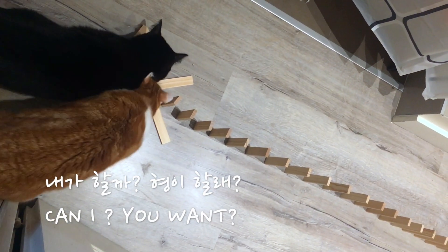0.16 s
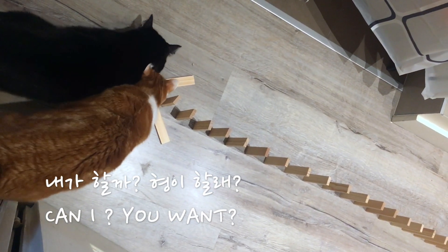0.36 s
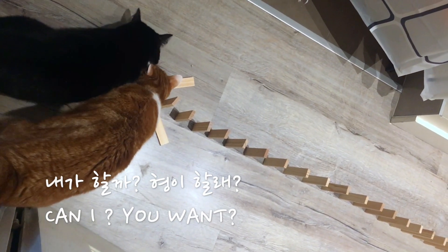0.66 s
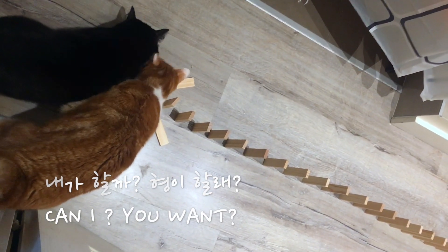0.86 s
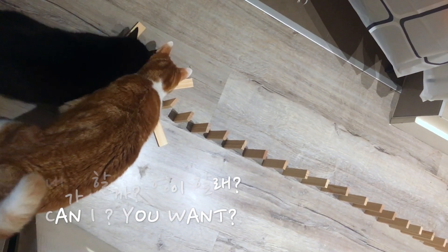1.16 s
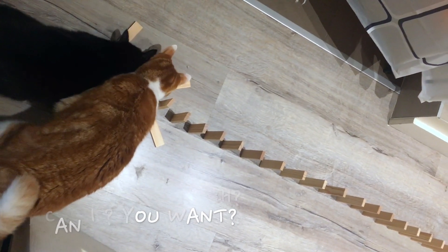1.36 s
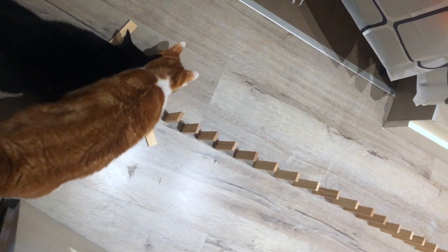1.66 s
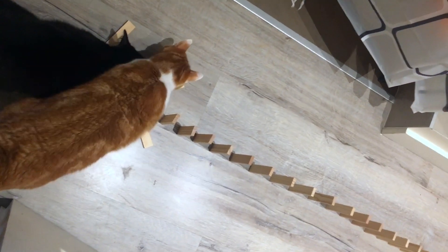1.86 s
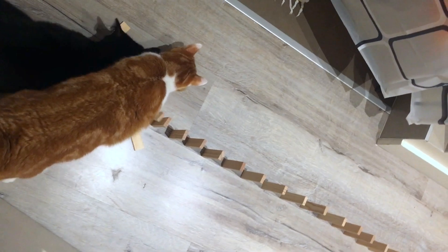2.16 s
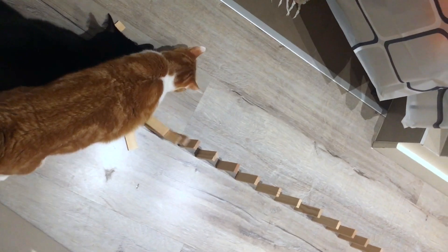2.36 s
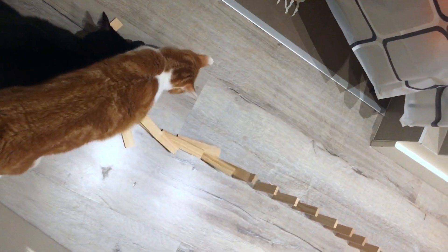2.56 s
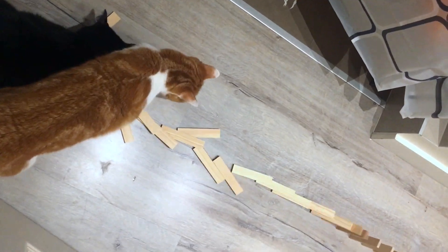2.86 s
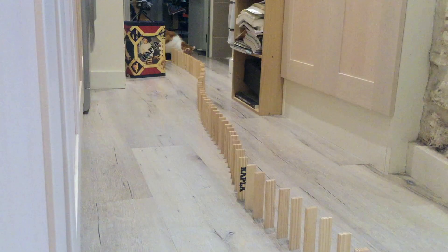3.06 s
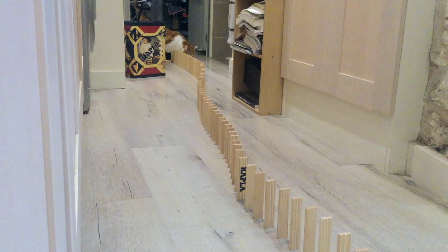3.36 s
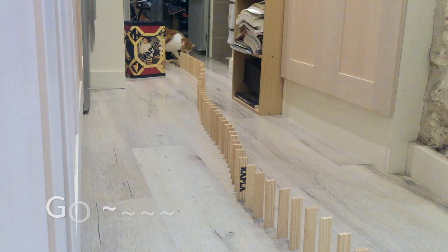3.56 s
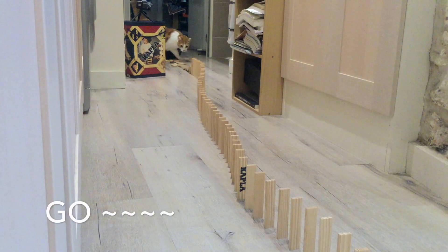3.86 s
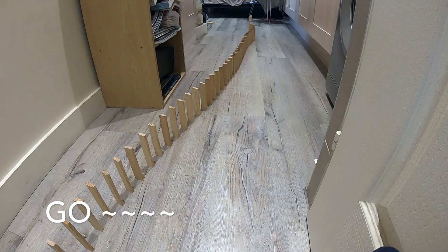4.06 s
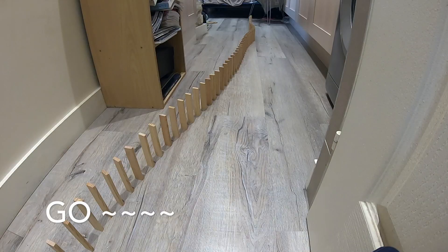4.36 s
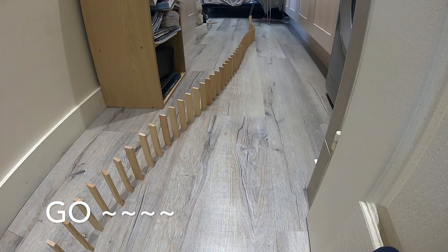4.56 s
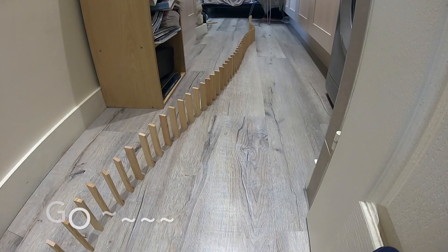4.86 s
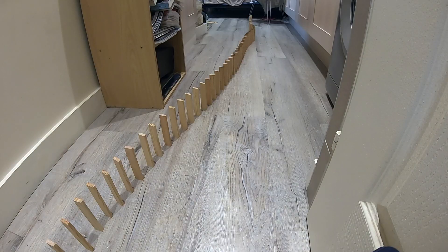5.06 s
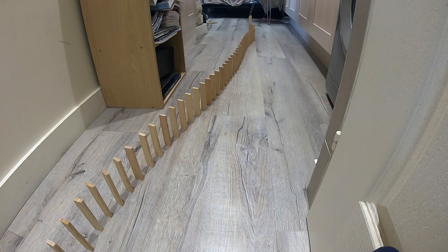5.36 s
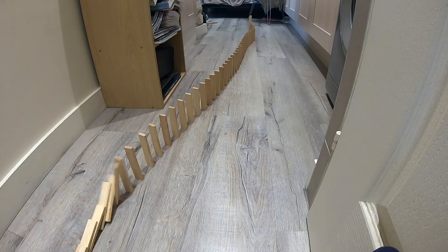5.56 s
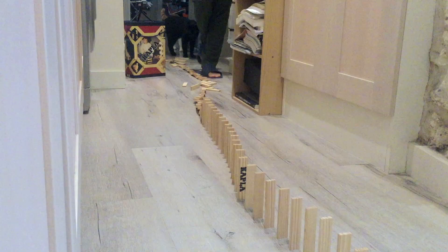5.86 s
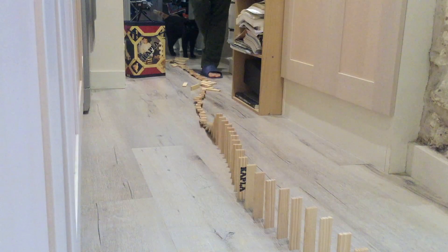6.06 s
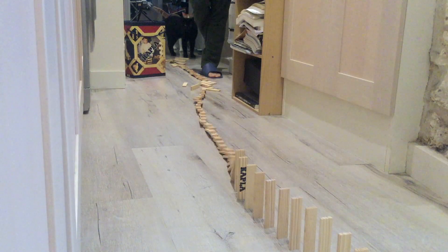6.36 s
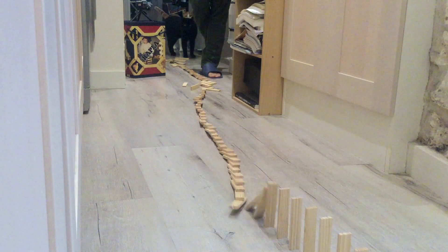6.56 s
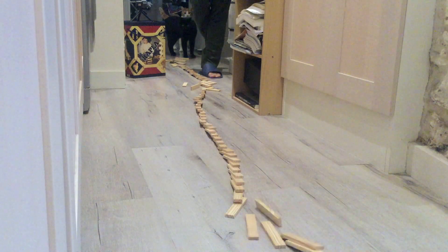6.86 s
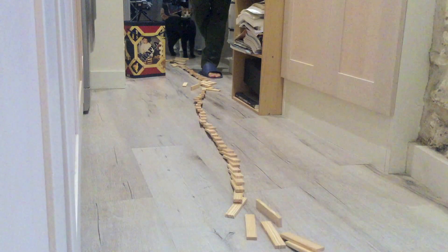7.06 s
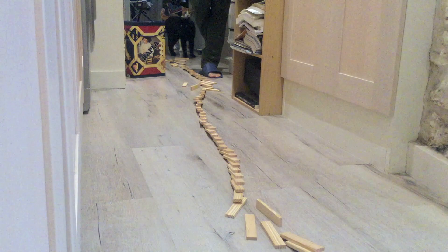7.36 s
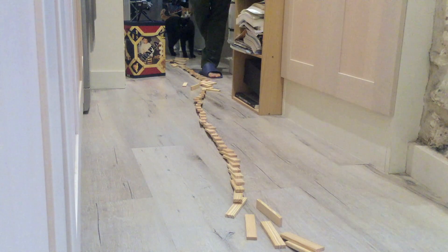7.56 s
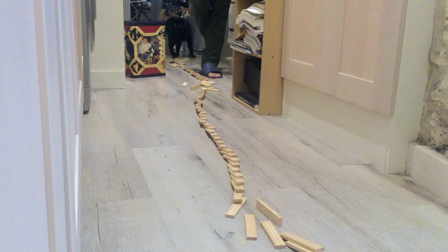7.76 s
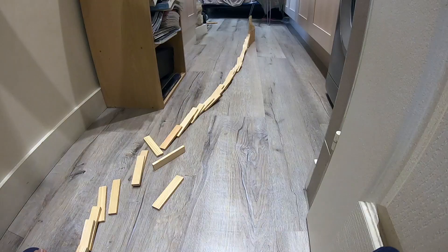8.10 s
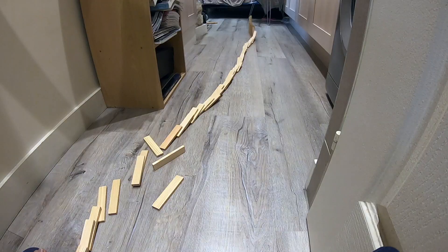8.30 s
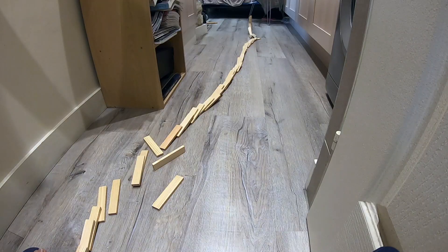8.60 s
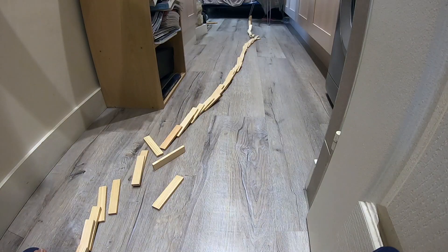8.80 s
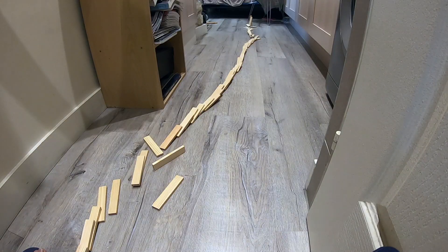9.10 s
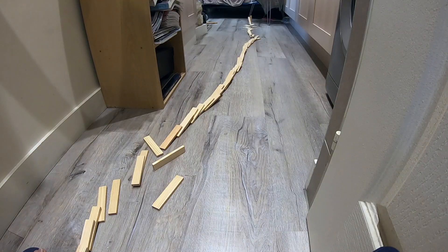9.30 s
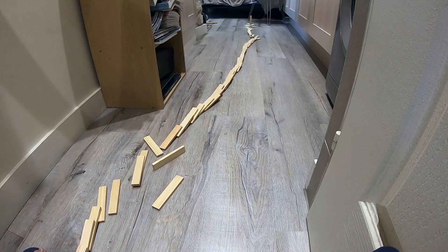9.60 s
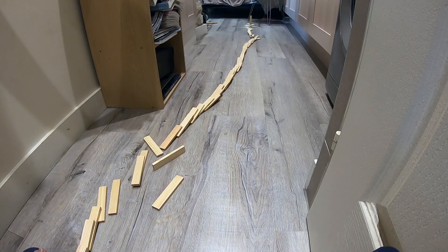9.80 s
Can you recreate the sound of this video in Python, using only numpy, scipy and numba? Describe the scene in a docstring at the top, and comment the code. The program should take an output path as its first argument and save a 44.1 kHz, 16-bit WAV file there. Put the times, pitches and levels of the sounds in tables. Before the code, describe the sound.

For the first two seconds a hallway is quiet, with low room noise, a few soft knocks of cat paws and a faint rustle of fur. At about 2.2 seconds small wooden planks begin toppling in a chain on a hard floor: rapid sharp clicks, short bright rings and light thuds, smeared by a short echo. At 3 seconds the clatter cuts off, then returns more distant and grows. It breaks again just after 4 seconds, with a soft bump and rustle. From about 4.6 seconds it builds, loud and wide, moving from the right toward the centre, with a brief low rumble near 5.5. Around 6 seconds the sound narrows and keeps running, getting closer and crisper, until planks slap flat around 7.5 and it thins out. At 8 seconds a dense, wide clatter resumes abruptly, ending with a few flat slaps by about 9.6 seconds.

```python
"""In a hallway, a chain of small wooden planks topples on a laminate floor.
Each blow makes a plank ring by bending and twisting, gives a sharp crack and thuds into the floor.
The hallway's echo smears it. We hear five stretches, each with its own tone colour, two in wide stereo.
Below lie the paws and fur of two cats, a faint hum, low rumble, room noise and hiss."""
import sys
import numpy as np
from scipy import signal
from scipy.fft import rfft, irfft, next_fast_len
from scipy.io import wavfile
from numba import njit

SR = 44100
rng = np.random.default_rng(int(sys.argv[2]) if len(sys.argv) > 2 else 0)


def store_pcm(level_fs):
    """Save levels as 16-bit WAV."""
    pcm = np.round(np.clip(level_fs, -1, 1) * 32767).astype(np.int16)
    wavfile.write(sys.argv[1], SR, np.atleast_2d(pcm).T)


N = 438354

# where the five stretches begin and end (time [s])
STRETCH_EDGES = [0, 2.998, 4.064, 5.906, 8.061, 9.95]
# tone colour from microphone and distance, one list a stretch (frequency [Hz], gain [dB])
MIC_COLOURS = [
    [(90, -11), (200, -4), (350, 2), (700, 8), (1400, 3), (2200, 12.5), (4500, 8), (9000, 6), (11000, -3.5),
     (16000, 7)],
    [(90, -16), (200, -9), (350, 2.5), (700, 1), (1400, 5), (2200, 9.5), (4500, 2), (9000, -5),
     (11000, -13.5), (16000, -6)],
    [(90, -18.5), (200, -4.5), (350, -0.1), (700, 0), (900, -7), (1400, -1.5), (2200, 3), (4500, 1),
     (9000, -6.5), (11000, -13), (16000, -21)],
    [(90, -23), (200, -8), (350, -2), (700, 2.5), (1400, 3), (2200, 2), (4500, 7), (9000, 8), (11000, -8.5),
     (16000, 0)],
    [(90, -26.5), (200, -11), (350, -3.5), (700, 3), (1400, -1), (2200, 1), (4500, 3), (9000, 1),
     (11000, -6.5), (16000, -10.5)],
]
# the floor's natural notes; a ring time is how long 60 dB of fading takes
# (pitch [Hz], level [dB], ring time [s])
FLOOR_NOTES = [(145, -15.5, 0.054), (190, -9, 0.036), (316, -2.15, 0.04), (412.7, -3.5, 0.051),
               (508, 0.5, 0.035), (642, -1.5, 0.024)]
# a plank's highest notes against its twisting note, stronger when it falls nearby (time [s], level [dB])
BRIGHTNESS = [(2.2, -15.5), (2.99, -13), (3.2, -12), (4.06, -11), (4.6, -30.5), (5.4, -27.5), (5.89, -14.5),
              (5.92, -10), (6.9, -2.5), (7.2, 0.5), (7.9, -1), (8.06, -38), (9.0, -32.5), (9.65, -28.5)]
# where the planks are falling (time [s], left over right [dB])
PAN = [(4.15, -13.5), (4.7, -19), (5.3, -9.5), (5.5, -3), (8.0, 1), (9.65, 2.5)]
TIME, PITCHES, LEVELS, DAMPING = 0, slice(1, 3), slice(3, 7), 8   # rows of the array from place_blows()


def falling_planks(start, end, mic):
    """The main blows of one stretch. A plank that slams flat sounds bright and hardly rings."""
    # (time [s], bending [dB], bending pitch [Hz], twisting pitch [Hz], thud [dB], twisting [dB])
    main_blows = [(2.1963, -48, 2820, 6380, -47, -56.5), (2.319, -25.5, 2820, 7800, -39, -37.5),
                  (2.3672, -29, 2880, 7270, -45, -55), (2.3962, -24, 2740, 6940, -37.5, -37.5),
                  (2.4584, -28.5, 2700, 7110, -38, -37), (2.469, -18, 2795, 7400, -36.5, -43.5),
                  (2.5151, -29.5, 2500, 7700, -36, -45.5), (2.5274, -22.5, 2410, 7700, -36, -35.5),
                  (2.571, -25, 2740, 6890, -37.5, -42.5), (2.577, -17.5, 2930, 7160, -37.5, -32.5),
                  (2.597, -17.5, 2820, 6900, -37, -35), (2.6235, -26, 3050, 7420, -33.5, -31.5),
                  (2.631, -19.5, 2920, 7600, -34, -31), (2.655, -30.5, 2880, 7540, -44, -26.5),
                  (2.6716, -15, 3130, 7660, -29, -29.5), (2.7214, -15, 3210, 5600, -32.5, -23),
                  (2.728, -16.5, 2360, 6200, -35.5, -32), (2.7701, -15.5, 2740, 6580, -38, -23),
                  (2.788, -22, 3480, 6400, -40, -35.5), (2.8167, -17.5, 3497, 6450, -38, -26.5),
                  (2.861, -23, 2790, 6870, -34, -29), (2.9075, -20.5, 2390, 5500, -31.5, -21.5),
                  (2.9505, -15.5, 2950, 5700, -35.5, -26.5), (2.988, -20.5, 2720, 6400, -33.5, -26.5),
                  (3.233, -49.5, 2790, 6300, -55.5, -63), (3.3553, -35, 2640, 6300, -53, -51.5),
                  (3.404, -50, 2460, 6310, -52, -65), (3.4332, -34, 2800, 7170, -46.5, -48),
                  (3.495, -41, 2390, 7600, -45.5, -55), (3.5004, -27, 3060, 7600, -43, -45.5),
                  (3.5486, -35, 2950, 7560, -45, -54), (3.5648, -31.5, 3100, 5790, -40.5, -43),
                  (3.6074, -27.5, 2300, 7800, -39, -47), (3.6167, -29, 2970, 7540, -42, -43),
                  (3.656, -27, 2710, 7630, -38, -40), (3.706, -26.5, 3010, 7700, -36, -35.5),
                  (3.7573, -24.5, 3480, 6210, -39.5, -33), (3.8034, -24.5, 2620, 6600, -41, -36),
                  (3.8227, -30, 2830, 6250, -40, -30), (3.896, -35, 2880, 6300, -41.5, -37),
                  (3.9432, -27, 2920, 7170, -36.5, -29), (3.984, -23.5, 2840, 6840, -42, -37),
                  (4.0198, -30, 3020, 6770, -42, -32), (4.0562, -16.5, 2370, 5050, -41, -29),
                  (4.5283, -81, 2370, 4970, -65, -82), (4.601, -40, 2830, 7480, -39, -55),
                  (4.7234, -20.5, 2700, 6420, -32.5, -40), (4.774, -30, 2820, 7040, -37, -45.5),
                  (4.8019, -20, 2680, 7600, -31, -37.5), (4.8656, -13, 2807, 7250, -26, -33),
                  (4.9205, -15.5, 2950, 7630, -28, -37.5), (4.9663, -22, 2720, 7520, -25.5, -35),
                  (4.9814, -15, 2940, 7630, -28.5, -33.5), (5.0099, -18.5, 2800, 7560, -33, -35.5),
                  (5.032, -23.5, 3070, 7340, -22, -28), (5.078, -15, 3040, 7480, -24, -24.5),
                  (5.125, -13, 2437, 7510, -27.5, -25.5), (5.1742, -15, 2790, 6250, -30.5, -22),
                  (5.214, -19, 3540, 6300, -33, -29), (5.222, -15.5, 2715, 7670, -28, -26.5),
                  (5.2622, -16.5, 2760, 7000, -24.5, -26.5), (5.3123, -10.5, 2810, 6790, -28.5, -22.5),
                  (5.3541, -24.5, 2780, 6520, -23, -21.5), (5.3875, -10, 2930, 7180, -34.5, -26.5),
                  (5.395, -26, 2280, 6630, -35, -23), (5.4245, -15, 2780, 6690, -26.5, -23.5),
                  (5.4598, -11, 2645, 6860, -25.5, -25), (5.5021, -10.5, 2860, 6040, -25, -22),
                  (5.5367, -12.5, 2830, 6070, -22, -23), (5.564, -16, 3010, 6140, -34, -20),
                  (5.581, -13, 2950, 6100, -26.5, -23), (5.616, -11.5, 2380, 5960, -24.5, -42.5),
                  (5.641, -18, 2396, 6080, -28, -25), (5.6538, -12, 2370, 7540, -15.5, -21.5),
                  (5.7253, -17.5, 2950, 7900, -28, -30.5), (5.754, -20.5, 2930, 7500, -27.5, -28),
                  (5.7633, -11.5, 2970, 7530, -17.5, -31.5), (5.7933, -32, 2920, 5240, -26, -27),
                  (5.849, -9, 2850, 7470, -23, -25.5), (5.873, -22, 2960, 7500, -21, -38),
                  (5.883, -26, 2210, 7440, -22.5, -21), (5.8977, -11.5, 3050, 7540, -22.5, -22.5),
                  (5.9277, -19, 2670, 5060, -35, -32.5), (5.9633, -16.5, 2830, 5100, -33.5, -31),
                  (5.9873, -28, 2390, 6370, -47, -28), (6.0002, -20.5, 2640, 6550, -35, -28),
                  (6.024, -24, 2830, 6500, -54, -33), (6.056, -20, 2570, 8000, -36, -36),
                  (6.102, -21, 2850, 7900, -36.5, -37), (6.131, -16.5, 3235, 7330, -38.5, -23),
                  (6.1708, -17.5, 2414, 7430, -37, -29), (6.206, -23, 2480, 6320, -36.5, -33),
                  (6.24, -20, 2490, 7660, -36, -32.5), (6.2772, -27, 2220, 7940, -34.5, -36.5),
                  (6.307, -24, 2740, 4870, -36.5, -37), (6.32, -20, 2730, 5000, -37.5, -30),
                  (6.3447, -33, 2640, 5000, -35.5, -34), (6.372, -18, 2620, 7100, -33, -34),
                  (6.4051, -15.5, 2440, 6300, -35.5, -27.5), (6.438, -19.5, 2710, 6260, -42, -31),
                  (6.472, -17.5, 2300, 5920, -35, -27), (6.5147, -16.5, 3010, 6100, -35.5, -32),
                  (6.556, -18.5, 2520, 5800, -34.5, -21), (6.6382, -14.5, 3530, 4300, -31.5, -22.5),
                  (6.647, -37, 2950, 6630, -41, -36), (6.7187, -26, 2900, 6300, -36, -47),
                  (6.748, -31, 2780, 6300, -39, -45), (6.771, -11, 2620, 7400, -31, -33),
                  (6.819, -30, 2910, 5470, -35.5, -40), (6.8684, -15.5, 2890, 6570, -33, -37),
                  (6.873, -13, 3010, 6510, -36, -30), (6.917, -25, 3036, 5090, -40.5, -39),
                  (6.927, -21, 2647, 5000, -38.5, -40), (6.945, -23, 2740, 6070, -43, -37),
                  (6.9625, -20.5, 2930, 5980, -36.5, -37), (7.0072, -23, 2330, 7610, -34, -36),
                  (7.058, -38, 3000, 6140, -33.5, -31), (7.06, -28, 2780, 7800, -47.5, -31),
                  (7.072, -25.5, 2680, 6000, -38, -35), (7.1134, -21.5, 2860, 6910, -35.5, -34),
                  (7.1338, -23.5, 2540, 7000, -46, -42), (7.156, -29, 2646, 6700, -37, -44.5),
                  (7.171, -26, 2660, 6710, -34.5, -45.5), (7.179, -25, 2520, 5660, -36, -30),
                  (7.205, -32, 2620, 6700, -36, -38), (7.239, -29, 2800, 7800, -38.5, -35),
                  (7.2531, -23, 2620, 7400, -40.5, -35), (7.275, -22, 2880, 7540, -44.5, -38),
                  (7.2825, -16, 3050, 7560, -28.5, -21), (7.362, -17, 3000, 7300, -26.5, -16),
                  (7.3858, -16, 3030, 8040, -37, -24.5), (7.4547, -25, 3100, 7890, -33.5, -29),
                  (7.4717, -23.5, 2870, 7600, -35, -31), (7.5228, -17, 2800, 7360, -30, -13.5),
                  (7.5993, -31.5, 2500, 6800, -43.5, -32.5), (7.604, -37.5, 2700, 8000, -44, -34),
                  (7.642, -35, 2770, 6800, -45, -51), (7.675, -11.5, 3240, 6560, -32.5, -18),
                  (7.685, -35.5, 2830, 5270, -53, -17), (7.761, -30, 2980, 6800, -35, -31),
                  (7.819, -36, 3030, 8000, -45, -39.5), (7.857, -30.5, 2955, 6700, -47, -45),
                  (8.0688, -13, 2770, 7820, -35, -27.5), (8.0759, -18.5, 2520, 7600, -32.5, -24.5),
                  (8.133, -13, 2600, 6200, -29, -23), (8.1696, -12.5, 2795, 6295, -37.5, -19.5),
                  (8.1962, -23, 2510, 6500, -36, -39), (8.209, -17, 2570, 6300, -37, -23),
                  (8.2364, -17.5, 2700, 6200, -39, -23.5), (8.2776, -13.5, 3005, 5870, -33, -23),
                  (8.317, -12.5, 3010, 5935, -32, -15), (8.4027, -12, 3195, 6300, -31, -21),
                  (8.409, -23.5, 2580, 6440, -40.5, -20.5), (8.483, -17.5, 2910, 6600, -30, -37.5),
                  (8.5355, -11, 2376, 6800, -27, -22.5), (8.545, -15, 2940, 6840, -36, -31),
                  (8.5841, -19, 3020, 6550, -39, -46), (8.6313, -10, 2700, 6420, -31, -21),
                  (8.642, -13.5, 3254, 6470, -36.5, -29), (8.6839, -10.5, 2670, 6420, -29, -23.5),
                  (8.7759, -13.5, 2860, 6024, -32, -25), (8.8281, -13.5, 2900, 7370, -35.5, -22.5),
                  (8.854, -22.5, 2710, 6550, -53, -35), (8.8838, -14.5, 2810, 6700, -33, -25.5),
                  (8.935, -16, 2630, 7900, -34.5, -41), (8.9446, -16, 2740, 7660, -34.5, -21.5),
                  (9.003, -17.5, 2695, 6630, -37, -33), (9.0368, -17, 2670, 7500, -44, -39.5),
                  (9.0467, -11, 3030, 6870, -32, -29), (9.054, -22.5, 2990, 6820, -37.5, -17),
                  (9.1284, -8.5, 2720, 7240, -33.5, -21), (9.133, -16.5, 2330, 4700, -32, -18),
                  (9.138, -27, 2770, 7110, -41, -15), (9.2274, -13, 2670, 7100, -31.5, -23),
                  (9.25, -19, 2800, 6700, -40, -21), (9.289, -13, 2860, 6930, -33, -20),
                  (9.295, -17.5, 2910, 6860, -44, -12.5), (9.3717, -19, 3300, 7000, -40.5, -20),
                  (9.4427, -12, 2540, 5630, -35, -15), (9.448, -18, 2550, 6950, -41, -12),
                  (9.462, -32, 2990, 7700, -49.5, -22), (9.533, -20, 3200, 7940, -37, -21),
                  (9.58, -22.5, 2965, 6800, -40.5, -30.5), (9.621, -23, 3140, 4770, -57, -33)]
    # when the last planks of the chain slam flat (from [s], to [s])
    last_planks = [(7.27, 7.7), (9.1, 9.65)]
    rows = [row for row in main_blows if start <= row[0] < end]
    s, bend_db, bend_hz, twist_hz, thud_db, twist_db = np.transpose(rows)
    # take off the microphone's colour, which scene() puts on again
    bend_db = bend_db - at_hz(mic, bend_hz)
    thud_db = thud_db - at_hz(mic, FLOOR_NOTES[3][0])
    twist_db = twist_db - at_hz(mic, twist_hz)
    damping_db = -2.2 * np.maximum(twist_db - bend_db - 5, 0)   # over 5 dB brighter means a flat slam
    damping_db -= 12 * sum((a < s) & (s < b) for a, b in last_planks)
    return place_blows(s, bend_hz, twist_hz, bend_db, thud_db, twist_db, damping_db)


def place_blows(s, bend_hz, twist_hz, bend_db, thud_db, twist_db, damping_db):
    """Brightness, direction and snap follow where the planks fall. Returns one column a blow."""
    # a crack's first instant against the rest, highest for hard, near slaps (time [s], level [dB])
    snap_levels = [(2.2, 5), (2.65, -4.5), (2.99, 3.5), (3.2, 10), (4.06, 6), (4.6, 5), (5.4, -0.5),
                   (5.89, 3.5), (5.92, -1), (6.5, 6.5), (6.65, 8), (7.2, 8.5), (7.9, 4.5), (8.06, -11),
                   (9.0, 0.5), (9.65, -9)]
    top_db = twist_db + at_time(BRIGHTNESS, s) + 3.0 * rng.standard_normal(len(s))
    pan_db = at_time(PAN, s) + 5.5 * rng.standard_normal(len(s))
    snap_db = at_time(snap_levels, s)
    return np.array([s, bend_hz, twist_hz, bend_db, thud_db, twist_db,
                     top_db, pan_db, damping_db, snap_db])


def chatter(blows):
    """An edge ticks just before each blow, and the plank slaps twice more, weaker, right after it."""
    count, slaps = blows.shape[1], []
    for late, weak in rng.random((count, 2, 2)).T:
        slap = blows.copy()
        slap[TIME] += 0.001001 + .011 * late
        slap[LEVELS] += -7 - 6 * weak + 0.26 * blows[DAMPING]   # a flat slam bounces less
        slaps.append(slap)
    tick = blows.copy()
    early, faint = rng.random((count, 2)).T
    tick[TIME] -= 0.0016 + .004 * early
    tick[LEVELS] += -16 - 12 * faint
    return np.hstack(slaps + [tick])


def clatter(blows, end, lead_s, rebound_db, loss_db_per_s):
    """Slides and rebounds: small random blows, as strong as the fading energy of the main ones."""
    tries_per_s, hits_per_s = 500, 200
    span = end - blows[TIME, 0] + lead_s
    luck = rng.random((int(tries_per_s * span), 6))
    when, strength, bend_luck, twist_luck, _, which = luck[luck[:, 4] < hits_per_s / tries_per_s].T
    s = end - when * span
    age = np.maximum(s, blows[TIME, 0])[:, None] - blows[TIME]
    energy_left = (age >= 0) * amp(-2 * loss_db_per_s * np.maximum(age, 0))
    size_db = rebound_db - 13 - 5.5 * np.log(strength + 0.081)
    bend_db, thud_db, twist_db = 10 * np.log10(amp(2 * blows[LEVELS][:3]) @ energy_left.T + 1e-20)
    latest = np.sum(age >= 0, axis=1) - 1
    same_plank = blows[PITCHES, latest] * (1 + 0.0087 * (2 * bend_luck - 1))
    other_plank = [2680 + 300 * bend_luck, 5900 + 800 * twist_luck]
    bend_hz, twist_hz = np.where(which < 0.2, same_plank, other_plank)
    return place_blows(s, bend_hz, twist_hz, bend_db + size_db, thud_db + size_db + 4.5,
                       twist_db + size_db + 2, blows[DAMPING, latest] - 0.7)


def strike(size, s, bend_hz, twist_hz, bend_db, thud_db, twist_db, top_db, pan_db, damping_db, snap_db):
    """Each blow sets a plank and the floor ringing at their natural notes, with a crack on top."""
    # the plank bends (multiple of the bending pitch, level [dB], ring time [s])
    bending_notes = [(1.0, -7, 0.037), (.9, -19.5, 0.093), (1.08, -15.5, 0.026), (1.25, -21, 0.089)]
    # the plank twists (multiple of the twisting pitch, level [dB], ring time [s])
    twisting_notes = [(1.0, -1, 0.026)]
    # the plank's highest notes (pitch [Hz], level [dB], ring time [s])
    top_notes = [(11460, 11.5, 0.017), (13600, 2.5, 0.03)]
    out = np.zeros((2, size))
    for multiple, db, ring_s in bending_notes:
        ring(out, s, multiple * bend_hz, bend_db + damping_db + db, ring_s, pan_db)
    for multiple, db, ring_s in twisting_notes:
        ring(out, s, multiple * twist_hz, twist_db + damping_db + db, ring_s, pan_db)
    ring(out, s, twist_hz, twist_db + 0.1, 0.0079, pan_db)   # a short knock, even in a flat slam
    upper_bend_hz = 7600 * (1 + .025 * rng.standard_normal(len(s)))
    ring(out, s, upper_bend_hz, twist_db + .3 * damping_db - 7, 0.039, pan_db)
    plank_tuning, floor_tuning = (1 + rng.standard_normal((len(s), 2)) * [.043, .075]).T
    for hz, db, ring_s in top_notes:
        ring(out, s, hz * plank_tuning, top_db + db, ring_s, pan_db)
    thump_db = -0.53 * damping_db * (top_db - twist_db > -25)   # near, flat slams boost the deep notes
    for hz, db, ring_s in FLOOR_NOTES:
        ring(out, s, hz * floor_tuning, thud_db + db + thump_db * (hz < 250), ring_s, pan_db)
    return out + cracks(size, s, (thud_db, bend_db, twist_db, top_db), pan_db, snap_db)


def cracks(size, s, levels_db, pan_db, snap_db):
    """Each contact gives a burst of fast-fading noise that opens with an even shorter snap."""
    # noise for thud, bending, twisting and top (low [Hz], high [Hz], level [dB], fade time [s])
    bands = [(680, 1570, 1, 0.019), (1350, 3440, -5, 0.018), (3760, 8150, -2, 0.019),
             (9400, 18000, 1.8, 0.0097)]
    rise_s, snap_s = 0.00074, 0.0046
    smoothing = np.exp(-1 / (rise_s * SR))
    starts = np.clip((s * SR).astype(int), 0, size - 1)

    def fading_power(db, fade_s):
        kicks = np.array([np.bincount(starts, amp(2 * db + side * pan_db), size) for side in (1, -1)])
        return signal.lfilter([1], [1, -amp(-120 / (fade_s * SR))], kicks + 1e-18)

    out = np.zeros((2, size))
    for (low, high, db, fade_s), level_db in zip(bands, levels_db):
        power = fading_power(level_db + db, fade_s) + fading_power(level_db + db + snap_db, snap_s)
        loudness = signal.lfilter([1 - smoothing], [1, -smoothing], np.sqrt(power))
        out += loudness * rms_one(band_noise(size, low, high))
    return out


def tumbling_planks():
    """A plank in the air sings one note, wavering as it turns, until landing chokes it."""
    # planks ringing freely (time [s], pitch [Hz], level as heard [dB], time in the air [s])
    flights = [(2.319, 2630, -36.5, 0.035), (2.369, 2850, -40.5, 0.018), (2.395, 2720, -34, 0.027),
               (2.46, 2820, -35.0, 0.03), (2.474, 3050, -38.5, 0.02), (2.578, 3060, -28.5, 0.02),
               (2.592, 2790, -29, 0.023), (2.64, 3000, -37.5, 0.016), (2.756, 2370, -37.5, 0.024),
               (2.77, 6650, -27, 0.011), (2.778, 6340, -28, 0.018), (2.82, 3560, -35.5, 0.04),
               (2.824, 2800, -32.5, 0.024), (2.869, 2770, -36.5, 0.02), (2.953, 2950, -24, 0.018),
               (3.364, 2730, -51, 0.016), (3.42, 2890, -48, 0.046), (3.442, 2610, -48, 0.013),
               (3.504, 3070, -45, 0.026), (3.533, 3070, -45, 0.06), (3.624, 3100, -38, 0.018),
               (3.634, 2785, -37.0, 0.036), (3.705, 3050, -41, 0.022), (3.712, 7460, -44, 0.022),
               (3.73, 3020, -40, 0.026), (3.76, 3030, -39.5, 0.028), (3.765, 3500, -33.5, 0.02),
               (3.799, 6340, -36.5, 0.032), (3.819, 2740, -32.5, 0.017), (3.861, 2880, -37.0, 0.018),
               (3.867, 3610, -36.5, 0.018), (3.899, 2900, -39, 0.023), (3.989, 2960, -33.5, 0.03),
               (4.019, 2440, -41, 0.02), (4.021, 4710, -33, 0.016), (4.023, 2990, -37, 0.037),
               (4.025, 6650, -41, 0.022), (4.604, 2790, -49.5, 0.026), (4.737, 2700, -31.5, 0.018),
               (4.761, 2870, -33, 0.038), (4.813, 2683, -40.5, 0.042), (4.883, 3060, -34.5, 0.018),
               (4.937, 7600, -36, 0.017), (4.979, 3010, -27, 0.018), (5.004, 2800, -21, 0.018),
               (5.032, 3090, -27.5, 0.014), (5.072, 3060, -31, 0.042), (5.13, 2433, -29, 0.044),
               (5.174, 2710, -30.5, 0.05), (5.176, 6260, -32.0, 0.05), (5.224, 2770, -25, 0.017),
               (5.256, 2820, -30, 0.016), (5.276, 2736, -28, 0.022), (5.32, 2790, -32, 0.028),
               (5.386, 7630, -38, 0.022), (5.398, 6630, -36, 0.016), (5.426, 2690, -28, 0.038),
               (5.476, 2730, -30.5, 0.022), (5.539, 6120, -39, 0.058), (5.539, 7570, -33, 0.018),
               (5.543, 2945, -34, 0.028), (5.615, 2410, -33, 0.012), (5.637, 2390, -25, 0.016),
               (5.695, 7500, -43.0, 0.018), (5.787, 2880, -26.5, 0.018), (5.813, 2900, -30.5, 0.025),
               (5.855, 2930, -26, 0.03), (5.925, 2860, -30, 0.015), (5.942, 2700, -44, 0.016),
               (5.988, 6560, -35, 0.062), (5.992, 2764, -29, 0.028), (6.004, 7500, -44, 0.016),
               (6.152, 7460, -41.0, 0.036), (6.208, 2436, -34.5, 0.044), (6.256, 2470, -36.5, 0.016),
               (6.306, 2710, -36, 0.03), (6.344, 2720, -35.5, 0.026), (6.38, 2670, -41, 0.022),
               (6.433, 2720, -32, 0.034), (6.479, 5760, -38, 0.016), (6.491, 3750, -30, 0.018),
               (6.591, 2530, -37.0, 0.028), (6.645, 6220, -27, 0.018), (6.663, 6300, -38.5, 0.044),
               (6.962, 2976, -32, 0.028), (7.02, 5900, -36, 0.04), (7.068, 6000, -38, 0.02),
               (7.078, 2610, -33, 0.034), (7.126, 2620, -31, 0.054), (7.136, 2900, -37, 0.016),
               (7.192, 2580, -33, 0.074), (7.267, 2700, -36, 0.05), (7.289, 2910, -27, 0.02),
               (7.313, 2930, -40, 0.02), (7.483, 2760, -33, 0.039), (7.529, 2720, -30, 0.022),
               (7.552, 2760, -39, 0.034), (7.573, 7680, -40, 0.016), (7.623, 2730, -50, 0.016),
               (8.072, 2650, -29, 0.026), (8.078, 7340, -31.5, 0.027), (8.094, 2660, -31, 0.028),
               (8.183, 3550, -30, 0.021), (8.185, 2644, -27.5, 0.057), (8.225, 3600, -27, 0.019),
               (8.249, 2950, -29, 0.016), (8.257, 2610, -33.5, 0.016), (8.315, 7790, -31.5, 0.026),
               (8.337, 5860, -32, 0.024), (8.347, 7750, -36, 0.03), (8.369, 2530, -27.5, 0.03),
               (8.377, 5930, -38, 0.024), (8.404, 6380, -25, 0.016), (8.425, 6400, -37, 0.052),
               (8.475, 6450, -37, 0.018), (8.59, 2970, -33, 0.018), (8.672, 2670, -32, 0.023),
               (8.698, 2697, -27, 0.042), (8.732, 5990, -26, 0.028), (8.738, 2660, -27, 0.018),
               (8.76, 2920, -29, 0.017), (8.788, 5900, -30, 0.028), (8.85, 2690, -24, 0.044),
               (8.882, 2944, -28, 0.038), (8.886, 6820, -32, 0.032), (8.9, 2660, -27.5, 0.052),
               (8.958, 7590, -40, 0.016), (8.986, 2930, -34.0, 0.034), (8.988, 2638, -30, 0.064),
               (9.005, 2740, -32, 0.03), (9.053, 6680, -37, 0.028), (9.081, 2860, -32, 0.022),
               (9.107, 2560, -37, 0.018), (9.201, 3020, -30, 0.016), (9.211, 7410, -28, 0.018),
               (9.608, 3050, -46.0, 0.025)]
    free_cycles, landing_s = 920, .025   # to fade by 60 dB in the air, and once landed
    turns_per_s, waver_db, rise_s = 40, 4.5, .002
    out = np.zeros((2, N))
    for (s, hz, db, air_s), (phase, facing) in zip(flights, rng.random((len(flights), 2))):
        t = np.arange(int((air_s + landing_s) * SR)) / SR
        mic_db = at_hz(MIC_COLOURS[np.searchsorted(STRETCH_EDGES, s) - 1], hz)
        fade_db = 60 * (t * hz / free_cycles + np.maximum(t - air_s, 0) / landing_s)
        turn_db = waver_db * np.sin(2 * np.pi * (turns_per_s * t + facing))
        loudness = amp(db - mic_db - fade_db + turn_db) * np.clip(t / rise_s, 0, 1)
        tone = loudness * np.sin(2 * np.pi * (hz * t + phase))
        pan_db, start = at_time(PAN, s), int(s * SR)
        out[:, start:start + len(t)] += tone * amp([[pan_db / 2], [-pan_db / 2]])
    return out


def hallway(sound):
    """As the falling moves along, its sound blends through three patterns of echoes in turn."""
    cycle_s, out = .45, 0
    angle = np.pi * np.arange(len(sound)) / SR / cycle_s
    for k in range(3):
        share = np.sqrt(2 / 3) * np.cos(angle + k * np.pi / 3)
        out = out + signal.fftconvolve((share * sound)[None], echo_tails(), axes=1)[:, :len(sound)]
    return out


def echo_tails():
    """The hallway's answer to a click: two tails of noise, each band fading at its own rate."""
    # how long the hallway rings (frequency [Hz], ring time [s])
    echo_times = [(150, 0.5), (500, 0.87), (1500, 0.79), (3000, 0.52), (7000, 0.6), (14000, 0.04)]
    t, tails = np.arange(int(.6 * SR)) / SR, 0
    edges = 80 * 2 ** np.arange(0, 8, .5)
    for low, high in zip(edges, edges[1:]):
        ring_s = at_hz(echo_times, np.sqrt(low * high))
        tails = tails + band_noise((2, len(t)), low, high) * amp(-60 * t / ring_s) / np.sqrt(ring_s)
    tails *= np.clip(t / 0.0015, 0, 1)   # echoes build up after the direct sound
    tails *= amp(-20 * (t / 0.24) ** 2)   # the late tail sinks ever faster
    return tails / np.sqrt(np.sum(tails ** 2, axis=1, keepdims=True))


def cats():
    """Paws knock softly, claws tick and brushing fur rustles."""
    # steps (time [s], level [dB], knock pitch [Hz], claw against that level [dB])
    paws = [(0.304, -40, 173, -38), (0.7, -59, 357, -13), (0.943, -42.5, 150, -31), (1.169, -51, 300, -28),
            (1.249, -57, 231, -12), (1.276, -52, 152, -12), (1.44, -48, 152, -11), (1.478, -60.5, 630, 9.5),
            (1.748, -58, 467, -3), (4.208, -35, 232, -26)]
    # fur brushing (peak time [s], level [dB], rise [s], fall [s])
    rustles = [(0.36, -83, .4, 0.17), (0.68, -73, 0.33, 0.28), (0.95, -78, .02, 0.29),
               (1.28, -59.5, 0.01, 0.02), (1.58, -61.5, 0.15, 0.23), (2.12, -77, 0.013, 0.056),
               (4.07, -48, 0.065, 0.05), (4.153, -48.5, 0.0028, 0.054), (4.55, -71, .15, 0.23)]
    # tone colour of fur (frequency [Hz], level [dB])
    fur_colour = [(350, -35), (600, -15), (936, -14), (1890, -8), (2130, -9), (2680, -13.5), (4460, -12.5),
                  (15000, -18)]
    steps = np.zeros((2, N))
    s, paw_db, knock_hz, claw_db = np.transpose(paws)
    centre = np.zeros(len(s))
    ring(steps, s, knock_hz, paw_db - 0.5, 0.076, centre)
    for hz in np.geomspace(600, 5000, num=9):   # the tick is 3.5 dB weaker each octave up
        ring(steps, s, hz, paw_db + claw_db - 3.5 * np.log2(hz / 600), 0.0076, centre)
    fur = rms_one(colour(rng.standard_normal(N), fur_colour)) * swells(rustles)
    return steps + amp(-6.5) * fur


def hum_and_rumble():
    """A faint wavering hum and a low rumble swell and sink; both are narrow bands of noise."""
    # the hum (pitch [Hz], width [Hz], list of swells (peak time [s], level [dB], rise [s], fall [s]))
    hum_shape = (490, 27, [(1.85, -75.5, 0.41, 0.52), (4.2, -62.5, 0.19, 0.22)])
    # the rumble (peak time [s], level [dB], rise [s], fall [s])
    rumble_swells = [(0.06, -71, 0.055, .1), (2.62, -55.5, 0.19, .3), (5.09, -56, .15, .1),
                     (5.48, -33, 0.11, .12), (9.36, -43, 0.158, 0.17), (9.58, -57, 0.1, .15)]
    hum_hz, width_hz, hum_swells = hum_shape
    hum = amp(5) * narrow_noise(N, hum_hz, width_hz) * swells(hum_swells)
    return hum + narrow_noise(N, hz=50, width_hz=45) * swells(rumble_swells)


def room_noise(size, stretch, mains_db, start_db, end_db):
    """The quiet room as two channels of soft noise, with mains hum in the first."""
    # tone colour of the room, one list a stretch (frequency [Hz], level [dB])
    room_colours = [
        [(12, -36), (20, -10.5), (60, -1.5), (285, -19), (459, -26), (678, -23), (780, -34), (976, -31.5),
         (1760, -35), (2020, -43.5), (14300, -55), (16000, -57.5)],
        [(12, -52), (20, -15), (37, -14), (177, 5), (410, -14), (2320, -23), (5080, -23), (7730, -35),
         (8650, -48), (16000, -36)],
        [(12, -38), (20, -13), (49, -19), (96, -5), (154, -14.5), (310, -12.5), (377, -20), (485, -18),
         (949, -23), (1030, -34), (1760, -35), (16000, -74)],
        [(12, -53), (20, -23), (485, -11), (976, -27), (1660, -5.5), (2260, -35.5), (2990, 0), (16000, -35)],
        [(12, -34), (20, -21), (55, -18.5), (399, -21.5), (485, -37), (660, -52), (759, -25), (1530, -34.5),
         (5680, -61), (16000, -63)],
    ]
    noise = rms_one(colour(rng.standard_normal((2, size)), room_colours[stretch]))
    noise[0] += amp(mains_db) * narrow_noise(size, hz=50, width_hz=2.8)
    return noise * amp(np.linspace(start_db, end_db, size))


def ring(out, s, hz, db, ring_s, pan_db):
    """Add one fading note to out, struck at times s, each time with its own strength and sign."""
    strength, sign = rng.standard_normal((len(s), 2)).T
    gain = amp(db + 2.0 * strength) * np.sign(sign)
    hz = np.clip(hz * np.ones(len(s)), 50, .45 * SR)
    decay = np.full(len(s), amp(-60 / (ring_s * SR)))
    starts = (s * SR).astype(np.int64)
    add_sines(out, starts, gain, 2 * np.pi * hz / SR, decay, amp(pan_db / 2), amp(-pan_db / 2))


@njit
def add_sines(out, start, gain, phase_step, decay, left, right):
    """Add fading sine waves to two channels; each sample follows from the two before it."""
    for k in range(len(start)):
        a, b = 2 * decay[k] * np.cos(phase_step[k]), decay[k] ** 2
        now, last = gain[k] * np.sin(phase_step[k]), 0.0
        stop = min(out.shape[1], start[k] + int(-6 / np.log(decay[k])))
        for i in range(start[k], stop):
            out[0, i] += left[k] * now
            out[1, i] += right[k] * now
            now, last = a * now - b * last, now


def swells(rows):
    """Loudness that climbs 20 dB in each rise time and sinks 20 dB in each fall time."""
    t = np.arange(N) / SR
    return sum(amp(db - 20 * np.maximum((peak - t) / rise, (t - peak) / fall))
               for peak, db, rise, fall in rows)


def band_noise(shape, low_hz, high_hz):
    band = signal.butter(2, [low_hz, high_hz], "band", fs=SR, output="sos")
    return signal.sosfilt(band, rng.standard_normal(shape))


def narrow_noise(size, hz, width_hz):
    return rms_one(signal.lfilter(*signal.iirpeak(hz, hz / width_hz, SR), rng.standard_normal(size)))


def colour(x, points):
    """Turn frequencies up or down along a curve of (frequency [Hz], gain [dB])."""
    size = next_fast_len(x.shape[-1])
    hz = np.arange(size // 2 + 1) * SR / size
    return irfft(rfft(x, size) * amp(at_hz(points, hz)), size)[..., :x.shape[-1]]


def at_hz(points, hz):
    known_hz, values = np.transpose(points)
    return np.interp(np.log(hz + 1), np.log(known_hz), values)


def at_time(points, s):
    return np.interp(s, *np.transpose(points))


def amp(db):
    return 10 ** (np.asarray(db) / 20)


def rms_one(x):
    """Scale a signal to an average power of 1."""
    return x / np.sqrt(np.mean(x ** 2) + 1e-20)


def scene():
    """Five stretches that end sharply. Mid is what both ears share, side is how they differ."""
    # each stretch (echo [dB], stereo width [0-1], mains hum against room noise [dB], room noise at
    # start [dB], at end [dB], rebound level [dB], rebound fading [dB/s])
    stretches = [(-6.5, 0, -5.5, -58, -58, -7, 130), (0, 0.00095, -20, -75, -77, -9, 130),
                 (-1.5, 0.66, 4.5, -61, -59, -12.5, 88), (-3, 0, -10, -77, -84.5, -3.5, 262),
                 (-1.5, 0.73, 4.5, -72, -66.5, -6.5, 236)]
    # how long the planks already clatter when each stretch begins (time [s])
    lead_times = [0, 0, 0, .25, .25]
    # side of the direct sound, whose bass is barely stereo (frequency [Hz], gain [dB])
    direct_side = [(120, -14.5), (400, -9.5), (900, 5.5), (15000, -0.5)]
    # side of the echo (frequency [Hz], gain [dB])
    echo_side = [(60, 9.5), (150, -26.5), (380, -19.5), (950, 0), (2380, -11), (5980, -3.5), (15000, 1.5)]
    soft_sounds = cats() + hum_and_rumble() + tumbling_planks()
    out, t = np.zeros((2, N)), np.arange(N) / SR
    for k, (echo_db, width, mains_db, start_db, end_db, rebound_db, loss) in enumerate(stretches):
        start, end, lead_s = STRETCH_EDGES[k], STRETCH_EDGES[k + 1], lead_times[k]
        part, lead = slice(int(start * SR), min(int(end * SR), N)), int(lead_s * SR)
        blows = falling_planks(start, end, MIC_COLOURS[k])
        s, *traits = np.hstack([blows, chatter(blows), clatter(blows, end, lead_s, rebound_db, loss)])
        direct = strike(len(t[part]) + lead, np.maximum(s - start + lead_s, 0), *traits)
        direct[:, lead:] += soft_sounds[:, part]
        mid, side = direct.mean(axis=0), colour((direct[0] - direct[1]) / 2, direct_side)
        near_db = at_time(BRIGHTNESS, start - lead_s + np.arange(len(mid)) / SR)
        echo_share = amp(-0.49 * (near_db - near_db.mean()))   # nearer planks have less echo
        echo = amp(echo_db) * hallway(mid * echo_share)
        mid, side = mid + echo[0], side + colour(amp(5.0) * echo[1], echo_side)
        mid, side = colour(np.array([mid, side]), MIC_COLOURS[k])[:, lead:]
        room = room_noise(len(mid), k, mains_db, start_db, end_db)
        mid, side = mid + room[0], width * (side + amp(1.5) * room[1])
        fade_in = (t[part] - start) / .004 if k > 0 else 1
        fade = np.clip(np.minimum(fade_in, (end - t[part]) / .003), 0, 1)
        out[:, part] = fade * np.array([mid + side, mid - side])
    return out


def record(dry):
    """Add a faint steady hiss, cut the deepest bass, round off the peaks and cut the highest treble."""
    # tone colour of the hiss (frequency [Hz], level [dB])
    hiss_colour = [(18, -25), (30, -0.5), (179, -3), (227, -3.5), (2290, -25), (8980, -30.5),
                   (16000, -35.5)]
    sound = dry + amp(-73) * rms_one(colour(rng.standard_normal(N), hiss_colour))
    sound = signal.sosfilt(signal.butter(2, 30, "high", fs=SR, output="sos"), sound)
    rounded = 1.119 * np.tanh(sound / 1.297)
    return signal.sosfilt(signal.cheby2(12, 70, 16600, fs=SR, output="sos"), rounded)


dry = scene()
out = record(dry)
store_pcm(out)
```